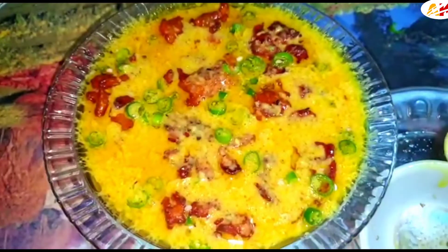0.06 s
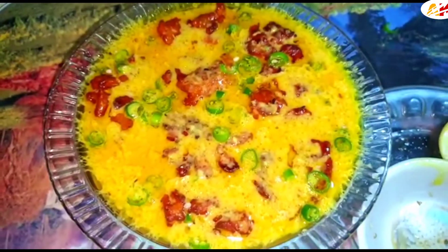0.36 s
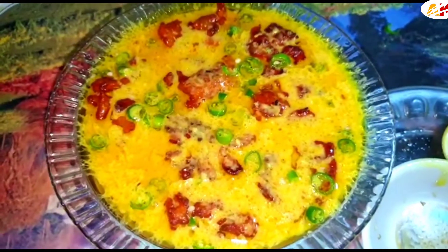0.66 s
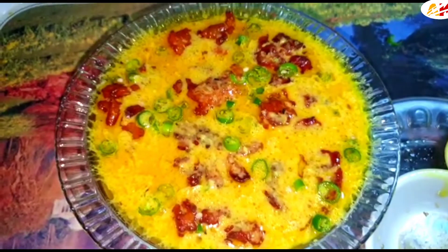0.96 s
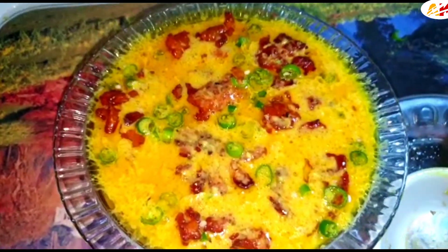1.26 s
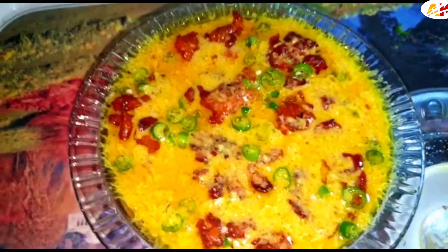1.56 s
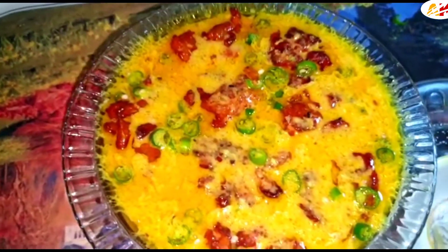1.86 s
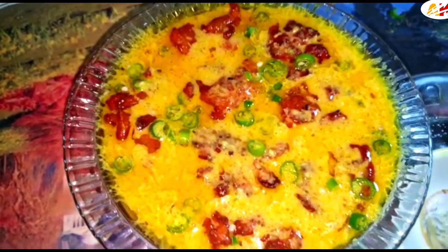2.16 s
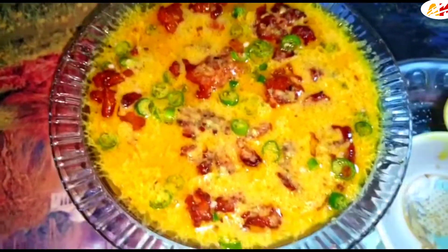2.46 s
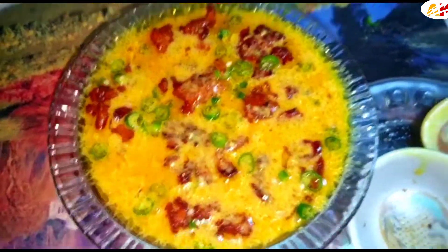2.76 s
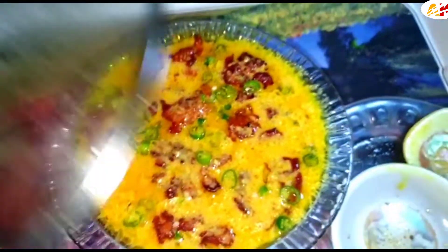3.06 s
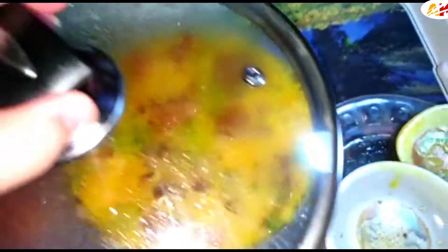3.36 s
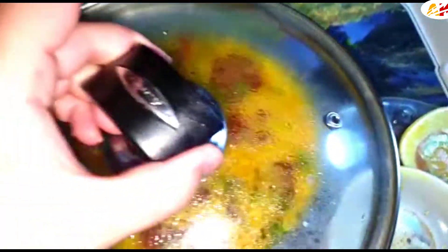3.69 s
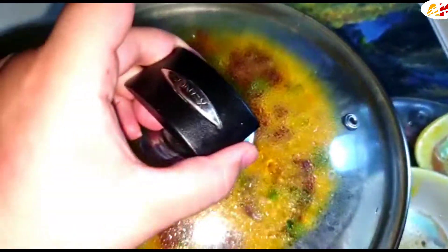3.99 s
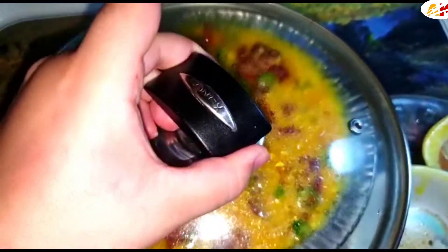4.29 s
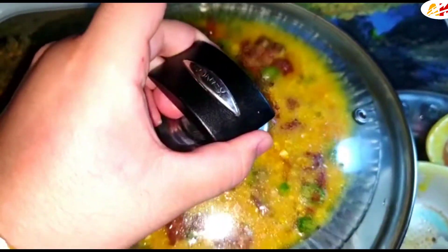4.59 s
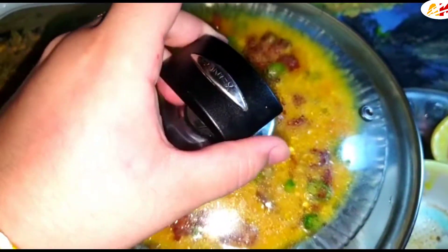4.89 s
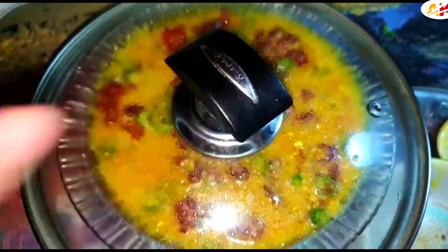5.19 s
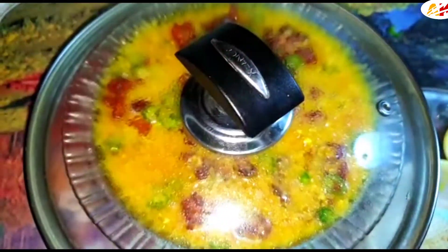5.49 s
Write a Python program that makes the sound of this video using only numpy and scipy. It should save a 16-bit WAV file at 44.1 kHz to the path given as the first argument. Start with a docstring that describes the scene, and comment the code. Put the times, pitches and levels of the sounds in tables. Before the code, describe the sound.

A glass lid with a metal rim is set on a pan, close by and slightly to the right: one light tap, a loud short clatter, then two muted clunks. The seconds before it are quiet, holding only a fading hiss, handling ticks, tiny high pings and a scuff ending in a soft knock. A low hum and a faint pulsing insect shrill continue throughout in the slightly echoing kitchen.

```python
"""A glass lid with a steel rim touches a pan, clatters down on it and settles with two dull clunks.
Each impact excites damped modes of lid and pan; the harder the blow, the brighter the sound.
Before it come a fading narrow hiss, friction scuffs, a soft knock, a few ticks and tiny high pings.
The small kitchen reverberates, a motor hums faintly over a low rumble, a thin whine comes and goes,
and an insect's shrill throbs evenly with its wing beats."""
import sys
import numpy as np
from scipy import signal
from scipy.fft import rfft, irfft
from scipy.io import wavfile

SR = 44100
rng = np.random.default_rng(int(sys.argv[2]) if len(sys.argv) > 2 else 0)


def materialize(psi):
    """Save the field psi as 16-bit PCM at rate SR to the path in sys.argv[1].

    A 1-D psi becomes a single channel; in a 2-D psi each row is a channel.
    """
    bounded = np.clip(np.atleast_2d(psi).T, -1, 1)
    quanta = np.round(bounded * 32767).astype(np.int16)
    wavfile.write(sys.argv[1], SR, quanta)


N = 244463
HZ = np.fft.rfftfreq(N, 1 / SR)
TIME = np.arange(N) / SR


def lid(lowest_hz=130):
    """Radiation from a small body: the lid's touch, clatter and clunks carry no deep bass."""
    return signal.lfilter(*signal.butter(2, lowest_hz, "high", fs=SR), touch() + clatter() + clunks())


def touch():
    """Damped vibration: held firmly, the rim rings only briefly when it first meets the pan."""
    # light contact: (time [s], level [dB], relative level of the steel's crack [dB])
    touches = [(4.0088, -24.5, 3)]
    # the held rim: (frequency [Hz], level [dB], T60 [s])
    rim_modes = [(164, -9, 0.16), (560, 15, 0.024), (565, -31, 0.2), (670, -5.5, 0.037), (934, -4.5, 0.069),
                 (1530, -21.5, 0.15), (2156, 9.5, 0.034), (2237, -21, 0.16), (2390, -1, 0.066),
                 (2660, -7, 0.053), (3920, -13, 0.03)]
    out = np.zeros((2, N))
    for s, db, crack_db in touches:
        add(out, s, amp(db) * ring(rim_modes, rise_s=0.001))
        add(out, s, amp(db + crack_db) * crack(decay_s=0.0076))
    return out


def clatter(soft_hz=1485, hard_hz=11000, seated_s=4.46, crack_db=-4):
    """Impact excitation: a harder blow has a shorter contact, so it drives higher modes."""
    # rim meets pan; hardness is how squarely steel strikes steel, the point struck sets body and clink:
    # (time [s], level [dB], hardness [dB], low body [dB], high clink [dB])
    blows = [(4.2780, -5.5, -5, 6, 2), (4.3631, -11.5, -6.5, 6, -8.5), (4.3980, -18, -28, 7.5, -14),
             (4.4250, -28.5, -22, 11.5, -8.5), (4.4365, -20.5, -11.5, 8.5, -7),
             (4.4445, -46.5, -25.5, 5, -9), (4.4724, -18.5, -17, 10, -10), (4.4875, -9, 1.5, -10.5, -4),
             (4.4990, -19, -12.5, -2, 0), (4.5021, -15, -21.5, -12, -3), (4.5110, -31, -31, -4, -14.5),
             (4.5980, -30, -22, 6, -14)]
    # the lid's broad modes, damped by the rim's contact: (frequency [Hz], level [dB], T60 [s])
    lid_modes = [(610, -8, 0.028), (705, -3, 0.026), (1240, -9, 0.03), (1454, -1.5, 0.025),
                 (1885, 1, 0.022), (2025, 4, 0.024), (2490, 3, 0.019), (2730, 0, 0.019), (3180, 4, 0.017),
                 (3360, 2, 0.018), (3990, 3, 0.018), (4380, -8, 0.018), (4570, -6, 0.018), (5230, -2, 0.02),
                 (6490, -9, 0.018), (7040, -16, 0.018), (7800, -15, 0.021), (9700, -14, 0.018),
                 (11000, -13, 0.018), (13300, -14, 0.018), (15100, -13, 0.015)]
    # the faint, long ring of the glass: (frequency [Hz], level [dB], T60 [s])
    glass_modes = [(586, -36, 0.31), (668, -37, 0.5), (703, -36, 0.35), (1986, -38, 0.3), (2116, -42, 0.4),
                   (2475, -30, 0.42), (3203, -38, 0.3), (3246, -38, 0.45), (3332, -36.5, 0.3),
                   (3410, -36, 0.3), (4016, -39, .3), (4096, -38, .35), (4608, -45, .4), (5180, -39, 0.3),
                   (5280, -42, 0.3), (9555, -46, 0.18)]
    # the full pan: (frequency [Hz], level [dB], T60 [s])
    pan_modes = [(158, -17, 0.097), (210, -16.5, 0.027), (238, -11.5, 0.015), (344, -18.5, 0.13),
                 (403, -8.5, 0.03), (466, -4, 0.051), (529, 1, 0.045), (988, -3.5, 0.029),
                 (1285, -22, 0.18), (1360, -41.5, .27)]
    body_below_hz, clink_above_hz = 1000, 2900
    ring_slope, thud_slope = 0.31, -0.063  # dB per dB of hardness: soft blows push the pan instead
    out = np.zeros((2, N))
    for s, db, hard_db, body_db, clink_db in blows:
        # the lid rattles on its edge, then drops into its seat, where each blow thuds the whole pan
        thud_db, ring_db = (-5, -0.5) if s > seated_s else (-16, 2)
        contact = signal.butter(2, min(soft_hz + hard_hz * amp(hard_db), SR / 3), fs=SR)
        struck_modes = [(hz, mode_db + body_db * (hz < body_below_hz) + clink_db * (hz > clink_above_hz),
                         t60) for hz, mode_db, t60 in lid_modes]
        clank = ring(struck_modes, rise_s=0.0016)
        glass = amp(ring_db + ring_slope * hard_db) * ring(glass_modes)
        pan = amp(thud_db + thud_slope * hard_db) * ring(pan_modes, rise_s=0.00031)
        add(out, s, amp(db) * signal.lfilter(*contact, clank + glass + pan))
        add(out, s, amp(db + hard_db + crack_db) * crack(decay_s=0.0045))
    return out


def clunks(grind_db=-8.5):
    """Coupled vibration: lid and pan ring as one, and soft contact filters out the treble."""
    # the lid rocks in its seat as the hand lets go: (time [s], level [dB], treble cutoff [Hz])
    rocks = [(4.7770, -32, 1670), (4.8190, -26.5, 3300), (4.8226, -22.5, 2970)]
    # lid and pan pressed together: (frequency [Hz], level [dB], T60 [s])
    seat_modes = [(164, -6, 0.045), (216.2, -5, 0.033), (337, -8, 0.06), (519, 4, 0.021),
                  (562, -18.5, 0.24), (695, -5, 0.056), (1006, -6.5, 0.032), (1303, 3, 0.02),
                  (1410, -2, 0.028), (1426, -23, 0.54), (1864, -6, 0.043), (2190, -3, 0.04),
                  (2500, -9.5, 0.083), (2720, 4.5, 0.0083), (3270, 3.5, 0.0082), (4070, -10, 0.036)]
    out = np.zeros((2, N))
    for s, db, cutoff_hz in rocks:
        clunk = ring(seat_modes, rise_s=0.00074)
        add(clunk, 0, amp(grind_db) * crack(decay_s=0.0088))
        add(out, s, amp(db) * signal.lfilter(*signal.butter(2, cutoff_hz, fs=SR), clunk))
    return out


def ring(modes, rise_s=0.00059, scatter_db=4.5, stagger_cycles=0.18, lead_s=0.00014):
    """Modal superposition: sinusoids start together and decay, differing with the point struck."""
    diffuse_hz, blur_cycles = 1600, 0.1
    t = np.arange(SR * 3 // 4) / SR
    out = np.zeros((2, len(t)))
    for hz, db, t60 in modes:
        mode_db = db + scatter_db * rng.standard_normal()
        apart = np.array([[1], [0]]) * min(hz / diffuse_hz, 1)  # long waves reach both sides in step
        phase = stagger_cycles * rng.standard_normal()
        left_lead = apart * (lead_s * hz + blur_cycles * rng.standard_normal())
        out += amp(mode_db - 60 * t / t60) * np.sin(2 * np.pi * (hz * t + phase + left_lead))
    return out * (1 - np.exp(-t / rise_s)) / 2


def crack(decay_s, rise_s=0.0025):
    """Contact noise: rough edges chatter for a few milliseconds as they meet."""
    # steel on steel: (frequency [Hz], spectral level [dB])
    spectrum = [(300, -26.5), (1000, -4), (2500, -1.5), (5000, -1), (8000, -6), (11000, -7), (15500, -21.5)]
    t = np.arange(2048) / SR
    return burst(spectrum, size=len(t)) * np.exp(-t / decay_s) * (1 - np.exp(-t / rise_s)) / 2


def knocks(lowest_hz=95):
    """Impulse response of a plate: a dull blow rings the worktop, with a small click."""
    # soft blows: (time [s], level [dB], relative level of the click [dB])
    blows = [(2.3711, -23.5, 4.5)]
    # the worktop: (frequency [Hz], level [dB], T60 [s])
    worktop_modes = [(138, -9, 0.042), (200, 6.5, 0.016), (337, -11, 0.1), (404, 10, 0.029),
                     (543, -11, 0.13), (596, -5, 0.099), (456, -15, 0.42), (672, -15.5, 0.068),
                     (1250, -13.5, 0.049), (2515, -9.5, 0.093)]
    out = np.zeros((2, N))
    for s, db, click_db in blows:
        add(out, s, amp(db) * ring(worktop_modes, rise_s=0.0018))
        add(out, s, amp(db + click_db) * crack(decay_s=0.0026))
    return signal.lfilter(*signal.butter(2, lowest_hz, "high", fs=SR), out)


def hiss(final_hz=2660, sag_hz=190, settle_s=0.5):
    """Narrow-band noise: it swells twice and fades, its centre sinking past steady resonances."""
    # the band: (offset from the centre [Hz], level [dB])
    band_shape = [(-900, -19), (-550, -6), (-330, 2), (-76, 4), (251, 3.5), (511, -1.5), (899, -31),
                  (2200, -26), (3402, -12.5), (4597, -39)]
    # whistling resonances: (frequency [Hz], bandwidth [Hz], lift [dB])
    peaks = [(2440, 70, 4), (2630, 55, 11), (2725, 45, 8), (2940, 40, 6), (3005, 35, 6), (3095, 40, 4)]
    # the swells and the fade: (time [s], level [dB])
    envelope = [(0, -54.5), (0.11, -46.5), (0.21, -51), (0.24, -45.5), (0.31, -45.5), (0.52, -46.5),
                (0.68, -51.5), (0.85, -60.5), (1.05, -71), (1.2, -110)]
    offset_hz, shape_db = np.transpose(band_shape)
    shape = amp(np.interp(np.fft.fftfreq(N, 1 / SR), offset_hz, shape_db, left=-np.inf, right=-np.inf))
    baseband = np.fft.ifft(np.fft.fft(noise(1, coherence=0.99)) * shape)
    centre_hz = final_hz + sag_hz * np.exp(-TIME / settle_s)
    band = (baseband * np.exp(2j * np.pi * np.cumsum(centre_hz) / SR)).real
    whistling = unit_rms(filtered(band, 1 + resonances(peaks, HZ)))
    return amp(curve(envelope)) * whistling * panned(right_db=2.0)


def scuffs(grain_db=3.0, grain_s=0.003):
    """Sliding friction: noise swells and stops, fluctuating as the surfaces catch unevenly."""
    # brief slides: (midpoint time [s], duration [s], level [dB])
    slides = [(1.107, 0.035, -61), (2.287, 0.1, -48.5), (2.316, 0.052, -46.5), (2.36, 0.031, -49),
              (5.355, 0.033, -66.5)]
    # friction noise: (frequency [Hz], spectral level [dB])
    spectrum = [(590, -16), (1000, -3), (1360, -19), (1500, -9), (1750, -2), (2450, 0.5), (3700, -2.5),
                (6120, -0.5), (15500, -12.5)]
    # resonances of the rubbed body: (frequency [Hz], bandwidth [Hz], lift [dB])
    peaks = [(2500, 330, 7), (4130, 190, -2), (5200, 300, -1), (6100, 140, 7.5)]
    out = np.zeros((2, N))
    for s, length, db in slides:
        size = int(length * SR)
        catches = np.interp(np.arange(size) / SR / grain_s, np.arange(256), rng.standard_normal(256))
        hz = np.fft.rfftfreq(size, 1 / SR)
        friction = noise(amp(read(spectrum, hz)) * (1 + resonances(peaks, hz)), size=size)
        add(out, s - length / 2, amp(db + grain_db * catches) * friction * np.hanning(size))
    return out


def pings(rise_s=0.003, decay_s=0.013, scratch_db=-6, scratch_s=0.011):
    """Resonant decay: a brief scratch starts each thin, very high ping."""
    # tiny pings: (time [s], level [dB], frequency ratio [1])
    events = [(1.204, -60, 1), (1.447, -55, 0.99), (1.451, -55, 0.91), (1.949, -42, 1), (5.34, -51, .93),
              (5.342, -51, 1)]
    # their resonances: (frequency [Hz], bandwidth [Hz], level [dB])
    modes = [(4470, 300, -17), (8600, 300, 3), (13750, 750, 0)]
    # the scratch: (frequency [Hz], spectral level [dB])
    scratch_spectrum = [(3000, 5), (7000, 21), (8600, 20), (10500, 25), (13500, 28), (15500, -23)]
    size = 4096
    t, hz = np.arange(size) / SR, np.fft.rfftfreq(size, 1 / SR)
    envelope = (1 - np.exp(-t / rise_s)) * np.exp(-t / decay_s)
    out = np.zeros((2, N))
    for s, db, pitch in events:
        add(out, s, amp(db) * noise(resonances(modes, hz / pitch), size=size) * envelope)
        add(out, s, amp(db + scratch_db) * burst(scratch_spectrum, size) * np.exp(-t / scratch_s))
    return out


def case_ticks():
    """Transient excitation: a case ticks in the hand, and its modes add a low thump."""
    # dry ticks: (time [s], click level [dB], thump level [dB])
    ticks = [(0.708, -49, -61), (0.7251, -36, -49), (0.742, -38, -55), (1.1071, -43, -49.5)]
    # the case: (frequency [Hz], level [dB], T60 [s])
    case_modes = [(84.5, 7, 0.09), (147, 12.5, 0.052), (227, 13.5, 0.044), (690, 17.5, 0.009),
                  (1000, 9, 0.0087), (1720, 16, 0.0063)]
    out = np.zeros((2, N))
    for s, click_db, thump_db in ticks:
        add(out, s, amp(click_db) * crack(decay_s=0.0016, rise_s=0.00043))
        add(out, s, amp(thump_db) * ring(case_modes, rise_s=0.00058))
    return out


def insect(beats_per_s=10.717, first_beat_s=0.0375, steady_db=-60.0, throb_db=-54.5, overtone_db=-71):
    """Amplitude modulation: a shrill swells at each wing beat, led by two faint strokes an octave up."""
    # the rasping shrill: (frequency [Hz], spectral level [dB])
    spectrum = [(5600, -33.5), (6250, -19), (6650, -19), (7000, -9.5), (7230, 1), (7350, -10), (7480, 3),
                (7630, -3.5), (7900, -10), (8400, -28.5), (8800, -21.5), (9100, -56.5)]
    rise_beats, fall_beats = 0.18, 0.25
    beats = (TIME - first_beat_s) * beats_per_s
    from_beat = (beats + .5) % 1 - .5
    swell = np.maximum(np.exp(-(from_beat / rise_beats) ** 2), np.exp(-(beats % 1) / fall_beats))
    envelope = np.hypot(amp(steady_db), amp(throb_db) * swell)
    shrill = noise(amp(read(spectrum, HZ)), coherence=0.091) * envelope
    strokes = np.exp(-((from_beat + .22) / 0.065) ** 2) + np.exp(-((from_beat - .02) / 0.069) ** 2)
    overtone = noise(np.exp(-((HZ - 15000) / 850) ** 2)) * strokes * amp(overtone_db)
    return (shrill + overtone) * panned(right_db=10.0)


def rumble(still_db=-86, half_width_s=0.06):
    """Structure-borne noise: a low rumble swells briefly at each shift of a hand's grip."""
    # shifts of the grip: (midpoint time [s], level [dB])
    shifts = [(0.46, -50), (0.76, -51.5), (1.04, -52), (1.114, -52), (2.9, -54.5)]
    # the rumble: (frequency [Hz], spectral level [dB])
    spectrum = [(20, -13), (45, 0), (75, 7.5), (110, -4), (220, -12), (1500, -67)]
    swells = sum(amp(db) * np.exp(-((TIME - s) / half_width_s) ** 2) for s, db in shifts)
    bass = noise(amp(read(spectrum, HZ)), coherence=0.25)
    return (amp(still_db) + swells) * bass * panned(right_db=-9.0)


def whine(centre_hz=5103, half_width_hz=80, start_s=2.85, end_s=4.9, fade_s=0.14, db=-84):
    """A broadened spectral line: a thin, unsteady whine fades in, holds and fades out."""
    gate = np.clip(np.minimum(TIME - start_s, end_s - TIME) / fade_s, 0, 1)
    line = 1 / (1 + ((HZ - centre_hz) / half_width_hz) ** 2)
    return amp(db) * gate * noise(line, coherence=0.77) * panned(right_db=11)


def motor(waver_hz=2.5, drift_hz=0.6):
    """Slow random modulation: a motor's low tones waver a little in level and pitch."""
    # the hum: (frequency [Hz], level [dB], waver depth [dB])
    tones = [(78.4, -66.5, 2.5), (100.1, -58.5, 3), (235, -66.5, 2), (412, -57.5, 0.8), (434, -62.5, 1.5)]
    # its rise and fall: (time [s], level [dB])
    envelope = [(0, -2.5), (1, 0), (2.5, 1), (3.2, 0), (3.8, -5), (4.5, -1.5), (5.0, -8.5), (5.54, -3.5)]
    out = np.zeros(N)
    for hz, db, waver_db in tones:
        swell, drift = noise(np.exp(-(HZ / waver_hz) ** 2))
        tone = np.sin(2 * np.pi * np.cumsum(hz + drift_hz * drift) / SR)
        out += amp(db + waver_db * swell) * unit_rms(tone)
    return out * amp(curve(envelope))


def background(air_db=-56, coherent_below_hz=800):
    """A diffuse field: room air and a motor's whirr, alike on both sides only in the bass, join its hum."""
    # room air: (frequency [Hz], spectral level [dB])
    air_spectrum = [(40, -6.5), (85, 2.5), (150, 0.5), (195, -4.5), (280, -8.5), (335, 0), (480, -2),
                    (620, -11.5), (1000, -17.5), (1800, -23.5), (3000, -25), (4500, -31), (8000, -37.5),
                    (15500, -28)]
    # the motor's whirr: (frequency [Hz], bandwidth [Hz], level [dB])
    whirr_bands = [(1272, 9.2, -84), (1330, 10, -77), (1392, 250, -76.5), (2267, 510, -74.5)]
    # rise and fall of air and whirr: (time [s], level [dB])
    envelope = [(0, 0.5), (2.4, 1), (3.6, -1), (4.4, 2), (5.0, -4.5), (5.54, -2.5)]
    # balance of the background: (frequency [Hz], left minus right level [dB])
    balance = [(100, 1.5), (270, 0.5), (450, -2.5), (800, 0), (1300, -3.5), (2100, -9), (3500, 0.5),
               (12000, -0.5)]
    coherence = 1 / (1 + (HZ / coherent_below_hz) ** 4)
    air = amp(air_db) * noise(amp(read(air_spectrum, HZ)), coherence * 0.65)
    lines = sum(amp(db) * unit_rms(1 / (1 + (2 * (HZ - hz) / width) ** 2))
                for hz, width, db in whirr_bands)
    whirr = noise(lines, coherence * 0.84) * np.sqrt(np.mean(lines ** 2))
    ambience = (air + whirr) * amp(curve(envelope)) + motor()
    return filtered(ambience, panned(-read(balance, HZ)))


def room(x, gap_s=0.0027, coherent_below_hz=1100):
    """Reverberation: the kitchen's hard walls return a dense tail whose treble dies first."""
    # reverberation time: (frequency [Hz], T60 [s])
    t60 = [(150, 0.82), (500, 0.75), (1400, 0.61), (3000, 0.53), (7000, 0.5), (15000, 0.3)]
    # colour of the tail: (frequency [Hz], level [dB])
    colour = [(100, 2.5), (500, -10.5), (800, -6), (1200, -5), (2000, -13.5), (3300, -10), (7000, -14),
              (14000, -4)]
    hz, t, spectra = signal.stft(rng.standard_normal((2, SR)), SR, nperseg=256)
    spectra = correlated(*spectra, 1 / (1 + (hz[:, None] / coherent_below_hz) ** 2))
    decay = amp(-60 * t / read(t60, hz)[:, None])
    decay /= np.sqrt(SR * np.mean(decay ** 2, axis=1, keepdims=True))  # equal energy in every band
    tail = signal.istft(spectra * decay * amp(read(colour, hz))[:, None], SR, nperseg=256)[1]
    tail *= np.clip(np.arange(tail.shape[1]) / SR / gap_s - .5, 0, 1)  # reflections arrive late
    return signal.fftconvolve(x, tail, axes=1)[:, :N]


def amp(db):
    """Amplitude ratio of a level in decibels."""
    return 10 ** (np.asarray(db) / 20)


def unit_rms(x):
    """Normalisation to an rms of 1."""
    return x / np.sqrt(np.mean(x ** 2) + 1e-20)


def read(points, hz):
    """Interpolation on a log-frequency axis."""
    f, value = np.transpose(points)
    return np.interp(np.log(hz + 1), np.log(f + 1), value)


def curve(points):
    """Linear interpolation in time."""
    return np.interp(TIME, *np.transpose(points))


def add(mix, s, sound):
    """Superposition of a stereo sound, starting at time s."""
    part = mix[:, max(round(s * SR), 0):][:, :sound.shape[1]]
    part += sound[:, :part.shape[1]]


def filtered(x, gain):
    """Linear filtering: a gain for each frequency."""
    return irfft(rfft(x) * gain, N)


def correlated(a, b, coherence):
    """Partial coherence: two independent noises become a left and a right that share a part."""
    return np.array([a, coherence * a + np.sqrt(1 - coherence ** 2) * b])


def noise(gain, coherence=0., size=N):
    """Spectral shaping: stereo noise of rms 1 with the amplitude spectrum gain."""
    white = rfft(rng.standard_normal((2, size)))
    return unit_rms(irfft(correlated(*white, coherence) * gain, size))


def burst(spectrum, size):
    """A short stretch of incoherent, coloured stereo noise."""
    return noise(amp(read(spectrum, np.fft.rfftfreq(size, 1 / SR))), size=size)


def resonances(peaks, f):
    """Sum of Lorentzian peaks at the frequencies f."""
    return sum(amp(db) / (1 + (2 * (f - hz) / width) ** 2) for hz, width, db in peaks)


def panned(right_db):
    """Level difference: left and right gains for a source off to one side."""
    return amp(np.array([[-.5], [.5]]) * right_db)


def scene():
    """Acoustic shadow: the near sounds lie to the right, so the left is shaded from their treble."""
    # the shadow: (frequency [Hz], left minus right level [dB])
    shadow = [(100, 1.5), (600, -1), (1400, -4.5), (3000, -7), (5500, -9), (9000, -3), (14000, -15.5)]
    near = lid() + knocks() + pings() + scuffs()
    near = filtered(near + room(near), panned(-read(shadow, HZ)))
    return near + case_ticks() + rumble() + hiss() + whine() + insect() + background()


def record(dry):
    """Clipping and band limiting: peaks stop at full scale, then a low-pass cuts the highest treble."""
    cutoff_hz = 15850
    low_pass = signal.firwin(511, cutoff_hz, window=("kaiser", 9), fs=SR)
    return signal.oaconvolve(np.clip(dry, -1, 1), low_pass[None], "same")


dry = scene()
out = record(dry)
materialize(out)
```